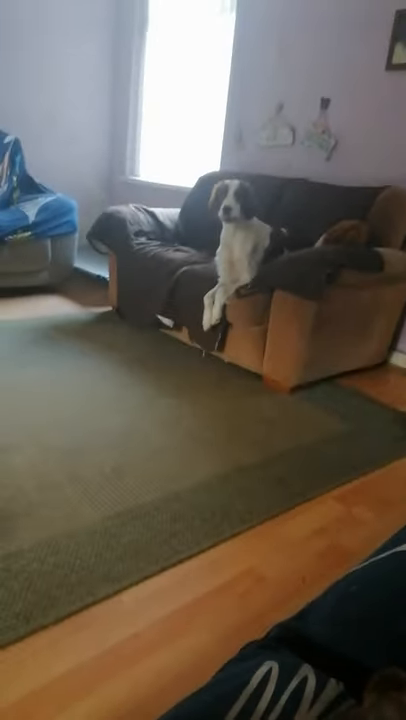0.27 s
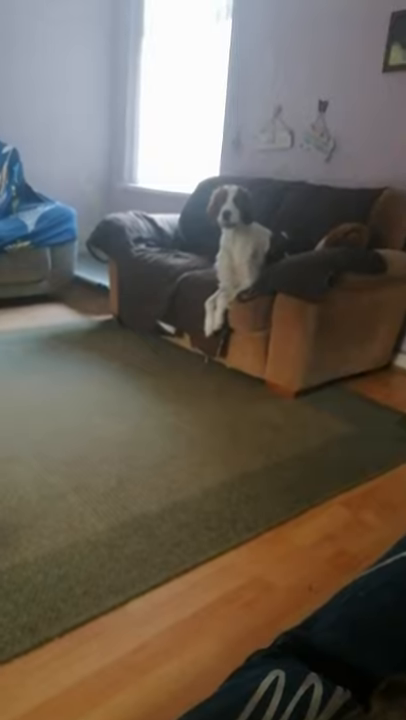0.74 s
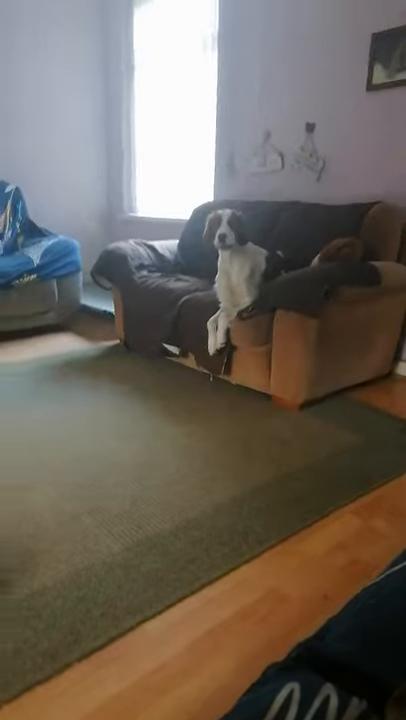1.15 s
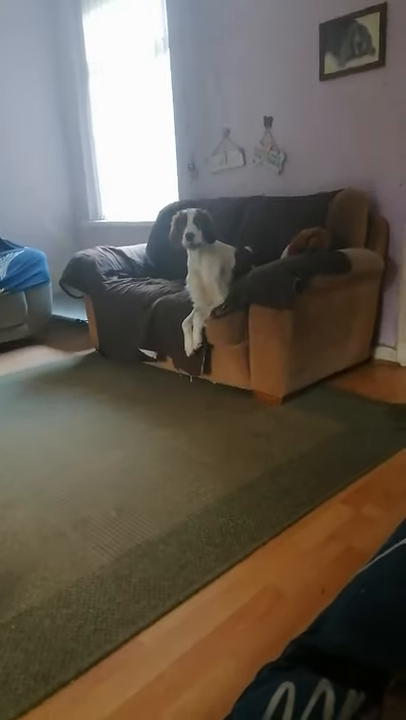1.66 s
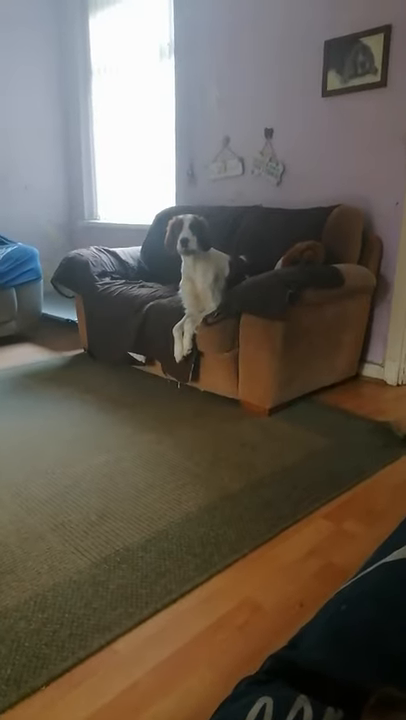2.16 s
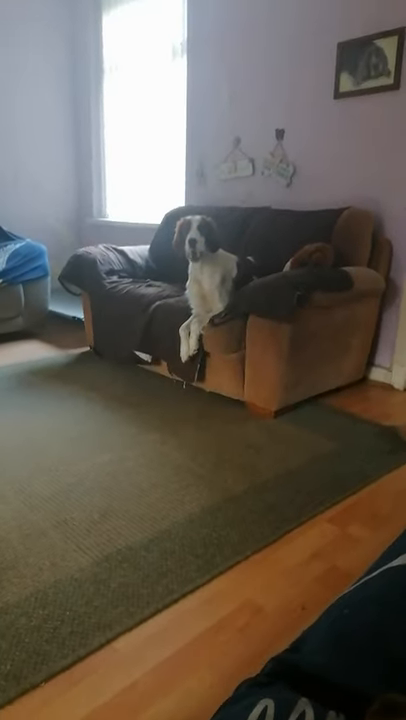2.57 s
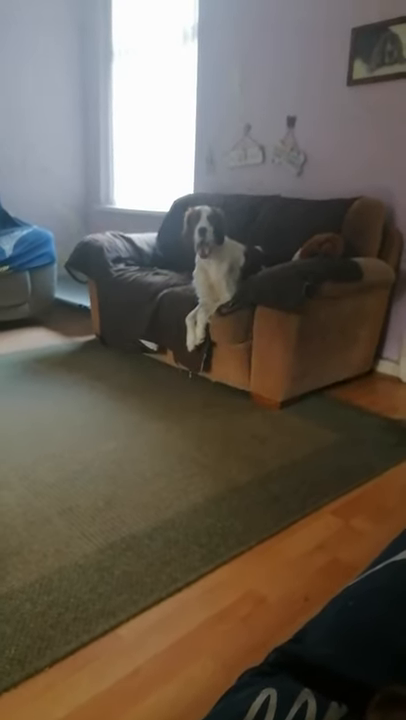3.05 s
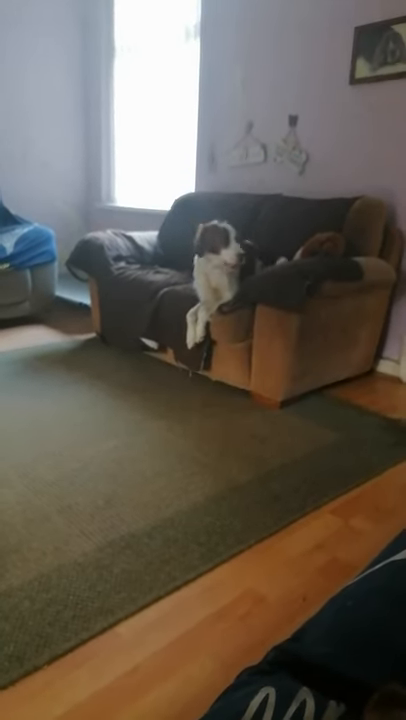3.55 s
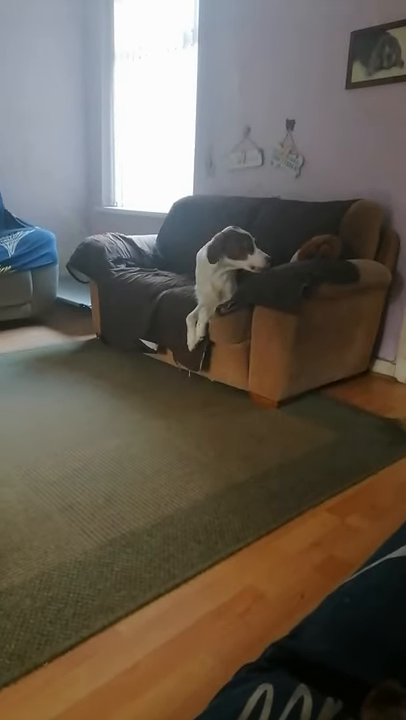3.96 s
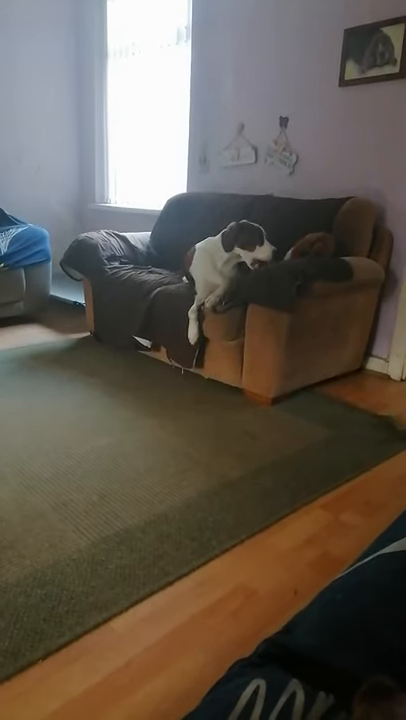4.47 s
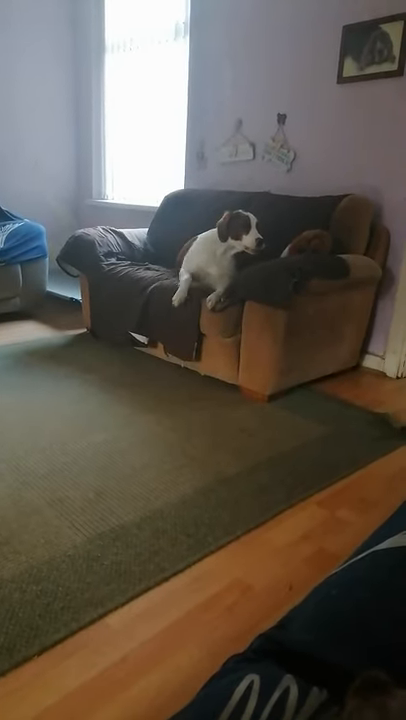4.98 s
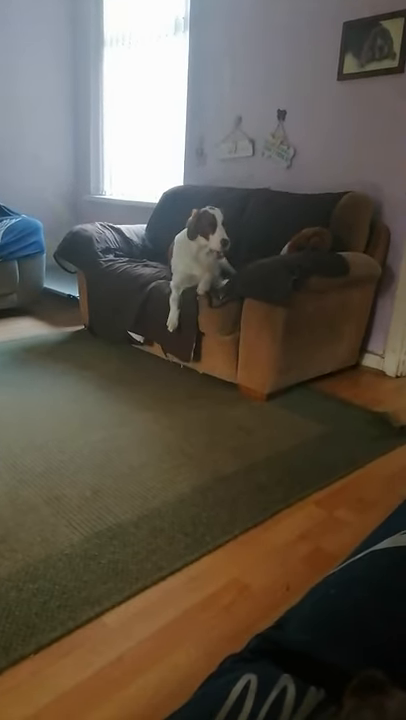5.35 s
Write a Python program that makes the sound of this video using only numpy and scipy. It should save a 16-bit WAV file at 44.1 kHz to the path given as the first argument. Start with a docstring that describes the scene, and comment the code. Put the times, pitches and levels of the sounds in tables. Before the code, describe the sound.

A dog whines in thin, high whistles, then yelps and howls, sinking into a growl in a quiet living room.

```python
"""Thin, high whistles and nasal squeaks come first: a dog whining in a quiet, lively living room.
Yelps and howls follow, sinking into a growl with a chest rumble under it. The throat has two oscillators:
the vocal folds give the voice, and breath blows the whistle, which the folds chop when both sound.
The dog rings on in the room, a few metres from a stereo microphone, over a faint hum and hiss."""
import sys
import numpy as np
from scipy import signal
from scipy.fft import rfft, irfft
from scipy.io import wavfile
from scipy.ndimage import uniform_filter1d

SR = 44100
rng = np.random.default_rng(int(sys.argv[2]) if len(sys.argv) > 2 else 0)


def log_audio(samples):
    """Write samples as a 16-bit WAV file to the path given in sys.argv[1]."""
    # one column per channel
    frames = np.atleast_2d(samples).T
    # limit to full scale, then quantise
    limited = np.clip(frames, -1, 1)
    pcm = np.round(limited * 32767).astype(np.int16)
    wavfile.write(sys.argv[1], SR, pcm)


N = 247841

# Breakpoints of each howl, yelp or growl: (time [s], pitch [Hz], level before mouth shaping [dB],
# mouth resonance [octaves above pitch], mouth opening [dB/octave], roughness [0-1])
CALLS = [
    [(1.02, 517, -70.5, 0.11, -19, 0), (1.06, 516, -43, 0.15, -23, 0.56), (1.14, 387, -77, 0.098, -10, 0.9)],
    [(1.795, 715, -60, 0.046, 8, 0.15), (1.83, 713.6, -25.5, 0.37, 39, 0.17),
     (1.98, 671.8, -25.5, 0.36, 58, 0.07), (2.13, 792, -29.5, 0.26, 28, 0),
     (2.17, 757, -25, 0.092, 12, 0.18), (2.195, 571, -29, 0.019, 29, 0.29),
     (2.24, 569.5, -74, 0.044, 19, 0.37)],
    [(2.94, 646, -60.5, 0.0, -19, 0), (2.965, 656.3, -19, 0.097, 0, 0.02),
     (3.04, 617.4, -33, 0.15, -5, 0.01), (3.08, 631, -21, 0.075, 2, 0.23),
     (3.33, 619, -19.5, 0.38, -3, 0.25)],
    [(3.312, 488.2, -22.5, 0.68, -21, 0.2), (3.35, 475.5, -24, 0.75, 6, 0.16),
     (3.58, 445, -24.5, 0.57, 7.5, 0.07), (3.65, 413.9, -21.5, 0.25, 9.5, 0.02),
     (3.78, 398.8, -30.5, 0.18, 10, 0.05), (3.93, 382, -33.5, 0.22, 8, 0.12),
     (3.98, 419.4, -32, -0.034, 13, 0.66)],
    [(4.18, 282, -58, 0.13, 9.5, 0.65), (4.26, 459.6, -41.5, 0.052, 4, 0.79),
     (4.32, 478, -43, 0.098, 38, 0.48)],
    [(4.748, 603, -26.5, -0.0085, -16, 0.05), (4.765, 554, -3.5, -1.43, 8, 0.2),
     (4.81, 433.8, -19.5, 0.5, -0.5, 0.24), (4.88, 364.7, -25, 0.7, 11.5, 0.15),
     (4.96, 283.7, -30.5, 1.53, -19, 0), (5.12, 264.4, -30.5, 1.23, 3, 0.04),
     (5.19, 197.6, -30.5, 1.52, -2, 0.57), (5.3, 216.1, -30, 1.32, 7, 0.42),
     (5.36, 240.7, -24, 1.44, 0, 0.37), (5.42, 294.1, -24, 1.15, 15.5, 0.05),
     (5.5, 300.1, -19, 2.12, 11, 0.17), (5.54, 265.7, -24.5, 1.12, 4, 0.2),
     (5.619, 291.3, -13.5, 1.9, 14, 0.08)],
]
# Tone of each call: (octave trim [dB], overtone trim [dB], treble trim [dB], subharmonics [per roughness])
CALL_TIMBRES = [(-17, 6, 4, 0.13), (-9.5, -7, -23, 0.041), (-0.5, -5.5, -26, 2.4), (8.5, 5.5, -25, 0.18),
                (11.5, 16.5, -15.5, 0.45), (-6, -5, -28, 0.59)]
# Throat colour of the voiced overtones: (frequency [Hz], relative level [dB])
THROAT_EQ = [(600, 28), (880, 33), (1430, 10.5), (1850, -5.5), (2300, -19), (2700, -9), (3050, -11),
             (3400, -73), (4020, -78.5), (5200, -24), (7100, -48), (9090, -41), (15500, -44.5)]
# Narrow cavities that leaking air excites: (centre [Hz], half width [Hz], relative level [dB])
RASP_CAVITIES = [(5125, 95, -22.5), (6820, 1000, -23), (8970, 270, -14)]
# Breakpoints of each whistle: (time [s], pitch [Hz], level [dB])
WHISTLES = [
    [(0.3, 3000, -63), (0.376, 3110, -68), (0.384, 3095, -41), (0.44, 3360, -44.5), (0.6, 3120, -49)],
    [(0.5, 2850, -63), (0.6, 3003, -35.5), (0.7, 2424, -54.5), (0.8, 2326, -51.5), (0.96, 2193, -54),
     (1.0, 2415, -40.5), (1.06, 2559, -51), (1.14, 2512, -50.5)],
    [(1.4, 2974, -59.5), (1.47, 3230, -61.5)],
    [(1.57, 2597, -75), (1.79, 2720, -62.5)],
    [(1.85, 3583, -51.5), (1.97, 3310, -50.5), (2.1, 3627, -53)],
    [(2.19, 2750, -43.5), (2.27, 2420, -70)],
    [(2.475, 3255, -54.5), (2.67, 3063, -72.5)],
    [(2.67, 3200, -60), (2.78, 2584, -54), (2.95, 2660, -55.5), (3.06, 2700, -43.5), (3.105, 2720, -33.5),
     (3.18, 2556, -49), (3.215, 2730, -34.5), (3.27, 2797, -49), (3.35, 2760, -70)],
    [(4.55, 1890, -57.5), (4.59, 2163, -49), (4.63, 2108, -62.5), (4.65, 2043, -41), (4.74, 1998, -39.5),
     (4.76, 2100, -33.5)],
    [(4.76, 2674, -51), (4.93, 2595, -58)],
]
# Air behind each whistle: (opening breath [dB], closing breath [dB], second partial [dB re breath],
# upper partials before breath colour [dB re breath])
WHISTLE_AIR = [(-80, -61.5, 4, 17), (-63, -62, 8, 8.5), (-70, -62, -14, -22), (-57, -59.5, -0.5, -20),
               (-86, -64, -22, 24.5), (-26.5, -69, -32.5, -7), (-57, -59.5, -24, -0.5),
               (-49.5, -48, 2.5, 1.5), (-57.5, -49, -4, 0), (-67, -71, 10, -18)]
# Colour of the air rushing past the whistle: (frequency [Hz], relative level [dB])
BREATH_EQ = [(710, -41.5), (1200, -11), (3200, -14.5), (4100, -19.5), (5200, -21.5), (7600, -19.5),
             (9250, 1.5), (10600, -9.5), (12200, -15), (15500, -49.5)]
# Breakpoints of each nasal squeak: (time [s], pitch [Hz], level [dB])
SQUEAKS = [
    [(0.342, 9370, -38.5), (0.38, 9230, -89), (0.47, 9170, -48), (0.58, 9050, -67), (0.66, 8180, -54)],
    [(1.45, 9480, -51.5), (1.575, 10470, -54)],
    [(1.57, 8320, -59.5), (1.69, 8460, -46), (1.73, 9490, -42), (1.82, 9550, -44)],
    [(1.82, 8820, -56), (2.14, 9124, -38.5), (2.24, 8940, -58)],
    [(2.5, 8560, -56.5), (2.565, 9400, -38), (2.62, 9560, -28.5), (2.68, 9090, -39.5), (2.76, 9300, -54)],
    [(4.185, 9010, -55), (4.24, 9590, -64.5)],
]
# Reverb decay: (frequency [Hz], time to fall 60 dB [s])
ROOM_T60 = [(300, 0.6), (2500, 0.48), (15000, 0.012)]
# Stereo image of reverb and hiss: (frequency [Hz], left-right correlation [0-1])
ROOM_CORRELATION = [(150, 0.27), (400, 0.14), (1200, 0.0096)]
# Colour of the hiss: (frequency [Hz], relative level [dB])
HISS_EQ = [(20, -10.5), (140, -25.5), (297, -19), (439, -22.5), (15500, -44.5)]
# Low hum: (centre [Hz], width [Hz], level [dB])
HUM_BANDS = [(142.8, 3.5, -74)]

JITTER, SHIMMER = 0.05, 1  # pitch and level wobble at full roughness (share)
BELOW_DB_PER_OCTAVE, ABOVE_DB_PER_OCTAVE = 19, 14.5  # flanks of the mouth resonance
TAUT_HZ = 600  # above this pitch the vowel resonance drops out
SWELL_DB, SWELL_S = 14, 0.03  # a whistle's breath and overtones swell in from this far down
FIRM_DB, PATCHY_DB = -50, 5  # breath that steadies the overtones; how far unsteady ones come and go
FLUTTER_RAD, FLUTTER_HZ = 0.3, 300  # base phase flutter of whistles and squeaks
RASP_WANDER, RASP_PATCHY_DB = 0.035, 5  # the tongue moves each cavity's pitch (share) and level
RUMBLE_START_S, RUMBLE_ATTACK_S, RUMBLE_LENGTH_S = 5.1, 0.11, 0.374
RUMBLE_DB, RUMBLE_RISE_DB = -41, 15
REVERB_DB, RIGHT_LAG_SAMPLES, HISS_DB = 2, 7, -64.5
SPLIT_HZ, DIP_SHARE, CUTOFF_HZ = 4135, 0.7, 15900  # voice crossover and mic dip; dip depth; top cut


def dog():
    """One mouth for voice, whistles and squeaks: puffs from the folds chop the high tones into sidebands."""
    out, airflow = np.zeros(N), np.ones(N)
    for start, voice, puffs in map(vocal_folds, map(mouth_shaping, CALLS, CALL_TIMBRES)):
        span = slice(start, start + len(voice))
        out[span] += voice
        airflow[span] += .6 * puffs
    nose = signal.butter(4, 1600, "high", fs=SR, output="sos")  # the narrow passage blocks low sidebands
    whistles = map(whistle, map(breath_drive, WHISTLES, WHISTLE_AIR))
    for start, tone, breath in [*whistles, *map(squeak, SQUEAKS)]:
        span = slice(start, start + len(tone))
        out[span] += signal.sosfilt(nose, tone * airflow[span]) + breath
    return out


def vocal_folds(rows):
    """Jittering folds buzz; strong-weak cycles add subharmonics, and leaking air pulses along."""
    start, fade, curves = automation(rows, fade_s=0.012)
    pitch, first_db, octave_db, overtone_db, opening_db, treble_db, sub, rough = curves
    sub, rough, size = np.clip(sub, 0, 1), np.clip(rough, 0, 1), len(pitch)
    phase = phase_of(pitch * (1 + JITTER * rough * drift(size, rate_hz=75)))
    buzz = sum(from_db(at_hz(THROAT_EQ, k * pitch) + opening_db * mouth_lift(k, pitch))
               * (k * pitch < CUTOFF_HZ) * np.sin(k * phase + rng.uniform(0, 2 * np.pi))
               for k in range(3, 28))
    low_buzz, high_buzz = crossover(buzz)
    low_air, high_air = crossover(coloured_noise(size, THROAT_EQ) * (1 + np.cos(phase)))
    overtones = (1 - rough) * low_buzz * (1 + 4.4 * sub * np.cos(phase / 2)) + 0.15 * rough * low_air
    taut = np.clip(pitch / 400 - 1, 0, .5)  # taut folds snap shut and buzz up into the treble
    leak = 0.32 * high_air + rasp(size) * (1 + 3.06 * np.cos(phase))
    treble = (taut * high_buzz + (1 - taut) * leak) * from_db(2 * drift(size, rate_hz=2.8))
    fifth = sub * from_db((first_db + octave_db) / 2) * np.sin(3 * phase / 2)
    body = np.sqrt(2) * (from_db(first_db) * np.sin(phase) + fifth + from_db(octave_db) * np.sin(2 * phase))
    build_up = np.clip(np.arange(size) / SR / .07, 0, 1) ** 2  # turbulence needs a moment
    voice = body + from_db(overtone_db) * overtones + build_up * from_db(treble_db) * treble
    voice *= 1 + SHIMMER * rough * drift(size, rate_hz=38.5)
    low_cut = signal.butter(6, .85 * pitch.min(), "high", fs=SR, output="sos")  # little radiates lower
    sub_octave = sub * from_db(first_db - 34) * np.sin(phase / 2)
    puffs = sum(.75 ** k * np.cos(k * phase) for k in range(1, 5))
    puffs *= np.clip(first_db / 10 + 5, 0, 1)  # soft calls hardly break the airflow
    return start, fade * (signal.sosfilt(low_cut, voice) + sub_octave), fade * puffs


def mouth_shaping(rows, timbre):
    """The mouth resonance favours the nearest partial; rough folds fall into strong-weak cycles."""
    times, pitch, level_db, mouth, opening_db, rough = np.transpose(rows)
    octave_trim, overtone_trim, treble_trim, sub = timbre

    def flank_db(octaves):
        """Level this far above the pitch, falling away on both sides of the resonance."""
        offset = octaves - mouth
        return level_db - np.maximum(-BELOW_DB_PER_OCTAVE * offset, ABOVE_DB_PER_OCTAVE * offset)

    overtone_db = flank_db(np.maximum(mouth, np.log2(3))) + overtone_trim
    return np.transpose([times, pitch, flank_db(0), flank_db(1) + octave_trim, overtone_db,
                         opening_db, level_db + treble_trim, sub * rough, rough])


def mouth_lift(k, pitch):
    """An open mouth brightens partial k, most of all near the vowel resonance."""
    vowel = (pitch < TAUT_HZ) * np.exp(-12 * np.log2(k * pitch / 1800) ** 2)
    return np.log2(min(k, 8) / 3) + 2 * vowel


def rasp(size):
    """Air noise rings in narrow cavities, each sliding and swelling on its own."""
    out = 0
    for hz, half_width_hz, level_db in RASP_CAVITIES:
        gain = np.sqrt(2) * from_db(level_db + RASP_PATCHY_DB * drift(size, rate_hz=15))
        noise = drift(size, half_width_hz)
        centre_hz = hz * (1 + RASP_WANDER * drift(size, rate_hz=3.3))
        out += gain * noise * np.cos(phase_of(centre_hz))
    return out


def whistle(rows):
    """A wavering near-sine with flickering overtones, and the breath that blows it."""
    start, fade, (pitch, first_db, *air_db) = automation(rows, fade_s=0.005)
    size = len(pitch)
    phase = phase_of(pitch * (1 + 0.0038 * drift(size, rate_hz=180)))
    swell_db = -SWELL_DB * np.exp(-np.arange(size) / (SWELL_S * SR))
    second_db, upper_db, breath_db = air_db + swell_db
    partials_db = first_db, second_db, *(upper_db + 0.73 * at_hz(BREATH_EQ, k * pitch) for k in range(3, 7))
    glide = np.abs(np.gradient(np.log(pitch))) * SR
    unsteady = np.clip(np.maximum((FIRM_DB - breath_db) / 10, glide / 2), .15, 1)  # weak air, fast slides
    tone = 0
    for k, level_db in enumerate(partials_db):
        flicker_db = min(k, 1) * unsteady * PATCHY_DB * (drift(size, rate_hz=5.7) - 1)
        flutter = (k + .5) * unsteady * FLUTTER_RAD * drift(size, FLUTTER_HZ)
        tone += np.sqrt(2) * from_db(level_db + flicker_db) * np.sin((k + 1) * phase + flutter)
    breath = from_db(breath_db + 3 * drift(size, rate_hz=6)) * coloured_noise(size, BREATH_EQ)
    tremble = from_db(3.5 * drift(size, rate_hz=39))
    return start, fade * tone * tremble, fade * breath


def breath_drive(rows, air):
    """The breath swells or sags evenly through a whistle and drives its overtones."""
    times, pitch, level_db = np.transpose(rows)
    opening_db, closing_db, second_trim, upper_trim = air
    breath_db = np.interp(times, times[[0, -1]], [opening_db, closing_db])
    return np.transpose([times, pitch, level_db, breath_db + second_trim, breath_db + upper_trim, breath_db])


def squeak(rows):
    """A thin wavering sine from the nose, with no breath noise."""
    start, fade, (pitch, level_db) = automation(rows, fade_s=0.0029)
    size = len(pitch)
    phase = phase_of(pitch * (1 + 0.0014 * drift(size, rate_hz=62)))
    gain = np.sqrt(2) * from_db(level_db + 3 * drift(size, rate_hz=110))
    flutter = FLUTTER_RAD / 2 * drift(size, FLUTTER_HZ)
    return start, fade * gain * np.sin(phase + flutter), 0


def chest_rumble():
    """Irregular chest vibration under the growl, too low for the room to scatter."""
    shape = [(0, -RUMBLE_RISE_DB), (RUMBLE_ATTACK_S, 0), (RUMBLE_LENGTH_S, 0)]
    start, fade, (level_db,) = automation(np.add(shape, [RUMBLE_START_S, RUMBLE_DB]), fade_s=0.076)
    chest = signal.butter(4, [108, 210], "band", fs=SR, output="sos")
    vibration = rms_one(signal.sosfilt(chest, rng.standard_normal(len(fade))))
    out = np.zeros(N)
    out[start:start + len(fade)] = fade * from_db(level_db) * vibration
    return out


def room(x):
    """Direct sound, earlier and louder on the left, then dense echoes that die faster in the treble."""
    t, edges = np.arange(SR) / SR, 60 * 2.0 ** np.arange(9)
    white, tail = irfft(stereo_spectra(SR, ROOM_CORRELATION), SR), 0
    for low, high in zip(edges, edges[1:]):
        band = signal.sosfilt(signal.butter(1, [low, high], "band", fs=SR, output="sos"), white)
        t60 = at_hz(ROOM_T60, np.sqrt(low * high))
        tail += band * from_db(-60 * t / t60) / np.sqrt(t60)
    tail *= np.clip(t / 0.0035, 0, 1)  # echoes build up after the first walls
    response = from_db(REVERB_DB) * tail / np.sqrt(np.sum(tail ** 2) / 2)
    response[0, 0] += from_db(2)
    response[1, RIGHT_LAG_SAMPLES] += 1
    return signal.fftconvolve(x[None], response, axes=1)[:, :N]


def room_tone():
    """A steady bed of room and microphone hiss, with a low wavering hum in the centre."""
    colour = from_db(at_hz(HISS_EQ, np.fft.rfftfreq(N, 1 / SR)))
    out = from_db(HISS_DB) * rms_one(irfft(stereo_spectra(N, ROOM_CORRELATION) * colour, N))
    for hz, width_hz, level_db in HUM_BANDS:
        r = np.exp(-np.pi * width_hz / SR)
        resonator = [1, -2 * r * np.cos(2 * np.pi * hz / SR), r * r]
        out += from_db(level_db) * rms_one(signal.lfilter([1, 0, -1], resonator, rng.standard_normal(N)))
    return out


def automation(rows, fade_s):
    """Breakpoints to a start sample, a fade at both ends and one curve per column after time."""
    times, *columns = np.transpose(rows)
    start = int(times[0] * SR)
    t = np.arange(start, min(int(times[-1] * SR), N)) / SR
    ramp = np.clip(np.minimum(t - times[0], times[-1] - t) / fade_s, 0, 1)
    return start, np.sin(np.pi / 2 * ramp) ** 2, [np.interp(t, times, c) for c in columns]


def crossover(x):
    """The bands below and above the voice crossover near 4 kHz, each levelled to rms 1."""
    bands = [signal.sosfilt(signal.butter(6, SPLIT_HZ, kind, fs=SR, output="sos"), x)
             for kind in ("low", "high")]
    return [band / np.sqrt(uniform_filter1d(band ** 2, size=2048) + 1e-12) for band in bands]


def drift(size, rate_hz):
    """Random modulator: noise through two one-pole low-passes, rms 1."""
    r = np.exp(-2 * np.pi * rate_hz / SR)
    return rms_one(signal.lfilter([1], [1, -2 * r, r * r], rng.standard_normal(size + 4000))[4000:])


def coloured_noise(size, eq):
    """Noise through an EQ curve, rms 1."""
    colour = from_db(at_hz(eq, np.fft.rfftfreq(size, 1 / SR)))
    return rms_one(irfft(rfft(rng.standard_normal(size)) * colour, size))


def stereo_spectra(size, correlation):
    """Left and right spectra of white noise, mixed from mid and side."""
    alike = np.clip(at_hz(correlation, np.fft.rfftfreq(size, 1 / SR)), 0, 1)
    mid, side = rfft(rng.standard_normal((2, size)))
    return np.sqrt(1 + alike) * mid + np.sqrt(1 - alike) * side * [[1], [-1]]


def phase_of(hz):
    """Running phase of a pitch curve."""
    return 2 * np.pi * np.cumsum(hz) / SR


def at_hz(points, hz):
    """A table read on a log-frequency axis."""
    frequencies, values = np.transpose(points)
    return np.interp(np.log(hz + 1e-9), np.log(frequencies), values)


def from_db(db):
    """Gain of a dB value."""
    return 10 ** (np.asarray(db) / 20)


def rms_one(x):
    """Scaled to rms 1."""
    return x / np.sqrt(np.mean(x ** 2) + 1e-20)


def scene():
    """The dog in the room and its dry chest rumble, over the room tone."""
    return room(dog()) + chest_rumble() + room_tone()


def record(dry):
    """The microphone has a dip near 4 kHz; the top is cut."""
    dip = signal.lfilter(*signal.iirpeak(SPLIT_HZ, Q=5, fs=SR), dry)
    top_cut = signal.cheby2(20, 60, CUTOFF_HZ, fs=SR, output="sos")
    return signal.sosfilt(top_cut, dry - DIP_SHARE * dip)


dry = scene()
out = record(dry)
log_audio(out)
```